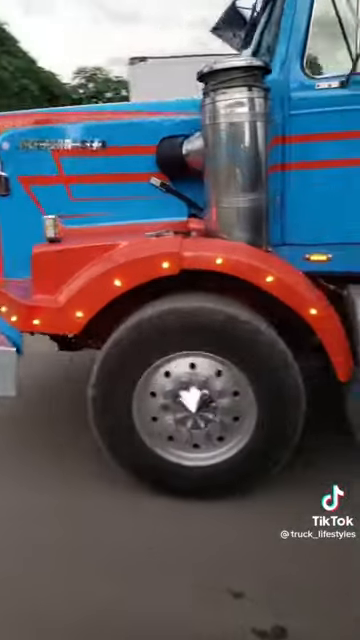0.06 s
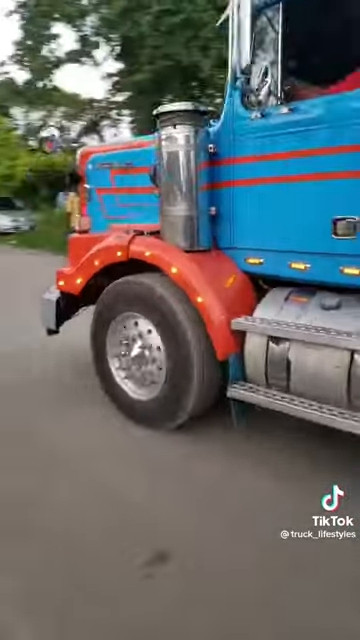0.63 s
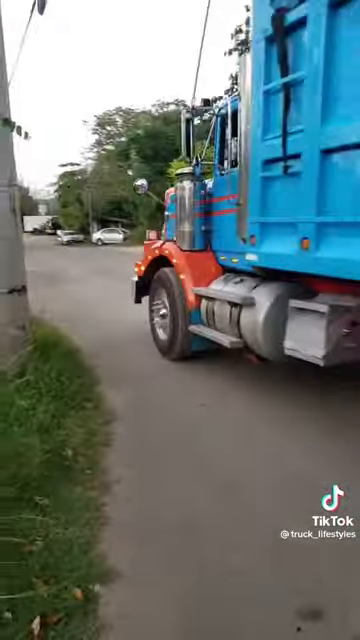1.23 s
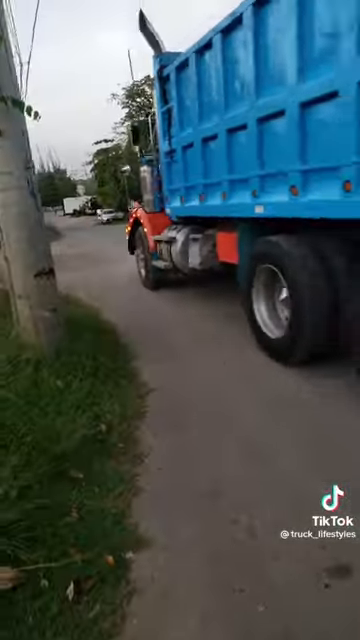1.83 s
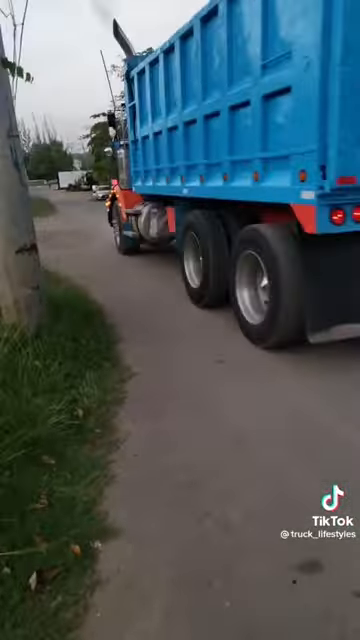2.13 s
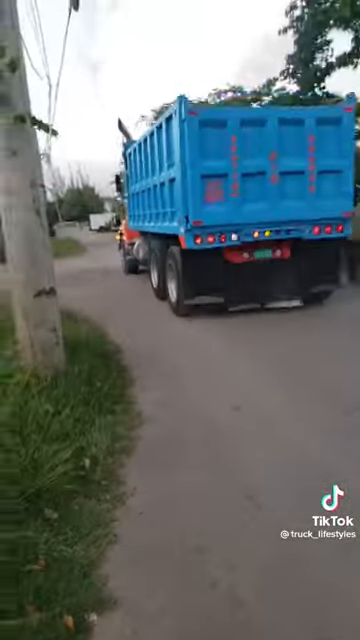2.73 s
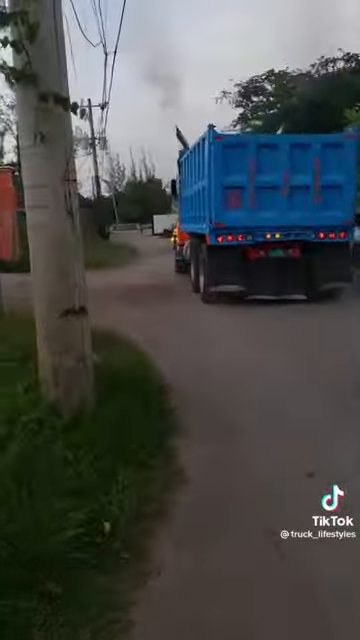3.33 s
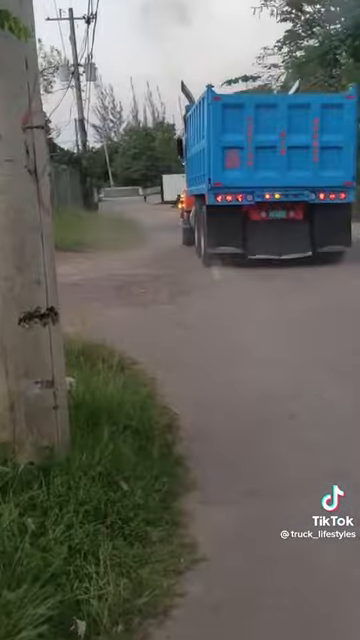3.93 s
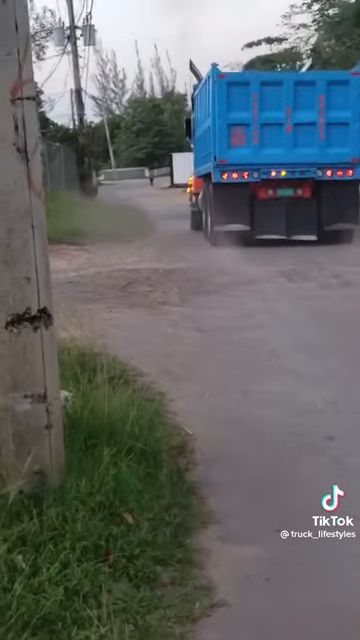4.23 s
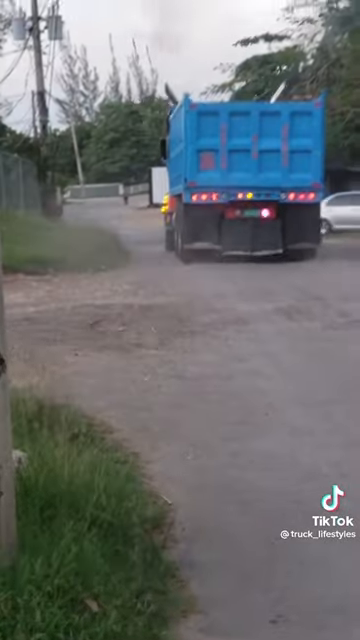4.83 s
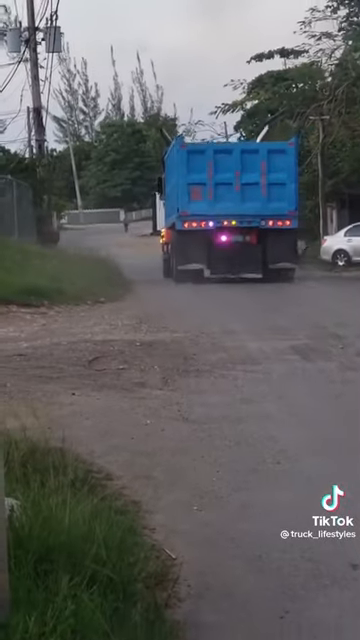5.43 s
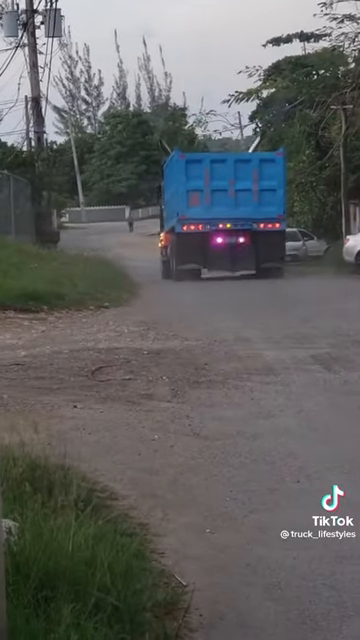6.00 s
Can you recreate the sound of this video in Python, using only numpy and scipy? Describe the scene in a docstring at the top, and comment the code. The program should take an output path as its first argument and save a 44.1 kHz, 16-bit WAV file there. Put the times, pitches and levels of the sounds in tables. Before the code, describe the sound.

A diesel dump truck drones past and up the road, each rev broken by a loud, rattling engine brake burst that echoes briefly.

```python
"""An exhaust drones, an engine rushes and a turbo whistles: a heavy diesel dump truck passes close by
and pulls away up a road through seven quick gear changes. Periodic firing drives the pipe resonances.
At each change the revs fall and the engine brake barks: the cylinders dump compressed air, and a volley
of shocks cracks from the stacks and echoes off trees and road. Late on a panel whines and a loose
fitting clinks. Two unlike microphone ports hear it over a low background rumble."""
import sys
import numpy as np
from scipy import signal
from scipy.fft import rfft, irfft
from scipy.io import wavfile
from scipy.ndimage import uniform_filter1d

SR = 44100
rng = np.random.default_rng(int(sys.argv[2]) if len(sys.argv) > 2 else 0)


def store_pcm(level_fs):
    """Save levels as 16-bit WAV."""
    pcm = np.round(np.clip(level_fs, -1, 1) * 32767).astype(np.int16)
    wavfile.write(sys.argv[1], SR, np.atleast_2d(pcm).T)


N = 267246
TIME = np.arange(N) / SR
HZ = np.fft.rfftfreq(N, 1 / SR)
BRAKE_SAG_HZ_PER_S = 140
RUSH_TAIL_S = 0.057  # gas still flows after the last crack

# Presses of the throttle; levels are relative: (start [s], firing rate then [Hz], top reached [s],
# top rate [Hz], foot lifts [s], firing note [dB], octave [dB], roar [dB], rasp [dB], machinery [dB],
# whistle [dB], turbo surge [Hz])
PULLS = [(0.0, 101.1, 0.1327, 107.9, 0.25, -19.5, -50, -19.5, -29.5, -33.5, -39.5, 740),
         (0.718, 93.93, 1.06, 110.1, 1.12, -18, -22.5, -23, -31.5, -38, -48, 524),
         (1.519, 89.7, 1.84, 111.2, 1.97, -25.5, -19.5, -25, -32, -40, -46, 1035),
         (2.32, 85.64, 2.5, 104.3, 2.44, -54, -45, -48, -52, -63, -62, 110),
         (2.79, 99.48, 3.0, 112.4, 3.07, -30.5, -26, -25.5, -30.5, -37.5, -48, 880),
         (3.43, 92.8, 3.73, 108.3, 4.11, -18.5, -32, -30.5, -34, -42, -44.5, 1100),
         (4.48, 92.04, 4.68, 109.6, 4.75, -17, -38, -51, -56, -49, -66, 56),
         (4.959, 101.1, 5.24, 112.9, 5.26, -18, -23, -32, -32.5, -40, -46, 1252),
         (5.58, 89.2, 5.64, 96.36, 5.93, -37, -45, -62, -37, -41.5, -62, 2),
         (5.83, 88.9, 5.97, 95.9, 6, -25.5, -31, -29.5, -39.5, -59, -54, 1.85)]
# Barks of the engine brake; levels are relative: (first crack [s], last crack [s], cracks [count],
# first cylinder [index, rounded], time to bite [s], fade [dB/s], crack [dB], gas rush [dB], boom [dB],
# 2nd harmonic [dB], 3rd harmonic [dB], blare [dB], low resonance [Hz], lift [dB], high resonance [Hz],
# lift [dB])
BRAKES = [(0.4178, 0.5488, 13, 0.5, 0.0031, -14, -4, -29, -20, -20, -22.5, -28, 466, 7.5, 2020, 1.5),
          (1.2294, 1.3665, 13, -1.5, 0.0057, -9, -5.5, -28.5, -21, -18, -26, -25.5, 373, 8, 1300, -1),
          (2.1336, 2.2668, 13, -1, 0.026, 8, -2.5, -28.5, -24.5, -42, -25.5, -27, 310, 6, 1300, 2),
          (3.2008, 3.3635, 16, -1, 0.034, 1, -4.5, -29.5, -50, -54, -35.5, -28, 1270, 0.5, 2020, -2),
          (4.2825, 4.483, 20, 1.5, 0.017, 15, -6.5, -26.5, -30.5, -22, -38, -27, 393.6, 5.5, 589, 5.5),
          (5.4314, 5.537, 11, 1, 0.008, 21, -8, -49, -36.5, -19.5, -48, -34, 810, 1.5, 2450, 4),
          (5.7052, 5.7772, 7, 2.5, 0.0037, 9, -8, -30, -28, -23, -27.5, -29, 840, 1.5, 2340, 5.5)]
# Spectrum of the brake's gas release from behind the truck: (frequency [Hz], level [dB])
CRACK_BEHIND = [(25,-34),(70,4.5),(180,4),(420,-7),(750,-2.5),(1000,-4),(1400,-3.5),(1900,-7),(2400,-9),(3550,-12),(4150,-10),(5200,-13),(7200,-24.5),(12000,-19.5),(15500,-42)]


def amp(db):
    """Amplitude ratio: tenfold for every 20 dB."""
    return 10 ** (np.asarray(db) / 20)


def unit(x):
    """Normalisation to rms 1."""
    return x / np.sqrt(np.mean(x ** 2) + 1e-20)


def at_hz(points, hz):
    """Interpolation of a spectrum on a log-frequency axis."""
    f, value = np.transpose(points)
    return np.interp(np.log(hz + 1), np.log(f), value)


def curves(rows):
    """Linear interpolation of each column of a time table."""
    s, *columns = np.transpose(rows)
    return [np.interp(TIME, s, c) for c in columns]


def bumps(rows):
    """Superposition of Gaussian bumps: (time [s], half width [s], height)."""
    return sum(height * np.exp(-((TIME - s) / width_s) ** 2) for s, width_s, height in rows)


def colour(x, points):
    """Minimum-phase filtering: the phase follows from the given magnitude spectrum."""
    gain_db = np.maximum(at_hz(points, abs(np.fft.fftfreq(N, 1 / SR))), -100)
    response = np.exp(np.conj(signal.hilbert(np.log(amp(gain_db)))))[:len(HZ)]
    return irfft(rfft(x) * response, N)


def wander(hz):
    """Random modulation: noise of rms 1, low-passed near hz."""
    return unit(irfft(rfft(rng.standard_normal(N)) * np.exp(-(HZ / hz) ** 2), N))


def narrowband(phase, width_hz):
    """Random quadrature modulation broadens a tone into a band."""
    return wander(width_hz) * np.cos(phase) + wander(width_hz) * np.sin(phase)


def turbulence():
    """Diffuse-field coherence: white noise at both ports, alike only in the bass."""
    # Likeness of the ports: (frequency [Hz], coherence [0-1])
    likeness = [(100,0.97),(280,0.95),(450,0),(700,0.11),(2000,0),(8000,0)]
    a, b = rfft(rng.standard_normal((2, N)))
    same = np.clip(at_hz(likeness, HZ), 0, 1)
    return irfft(np.array([a, same * a + np.sqrt(1 - same ** 2) * b]), N)


def ports(x, lag_s=0.001008, shade_hz=520):
    """Acoustic shadow: bass reaches both ports at once, treble gets to the shaded right one late."""
    direct = 1 / (1 + (HZ / shade_hz) ** 4)
    delayed = (1 - direct) * np.exp(-2j * np.pi * HZ * lag_s)
    return np.array([x, irfft(rfft(x) * (direct + delayed), N)])


def heading(x, beside, behind):
    """Directivity: the truck sounds deep from beside and harder once it shows its back."""
    turned = np.clip((TIME - 2.3) / 1.94, 0, 1)
    return (1 - turned) * colour(x, beside) + turned * colour(x, behind)


def climb_left(start, top_s, ease=1.7):
    """Power-law approach to top revs: 1 at the start of a pull, 0 from the top on."""
    return np.clip((top_s - TIME) / (top_s - start), 0, None) ** ease


def engine_speed(hunt=0.00787, fall_ease=1.25, shift_s=0.05):
    """The firing rate [Hz] is the fundamental: it climbs in each pull, falls, and rests for the shift."""
    firing_hz = np.zeros(N)
    for (start, low_hz, top_s, top_hz, lift, *_), after in zip(PULLS, PULLS[1:] + [None]):
        hz = top_hz - (top_hz - low_hz) * climb_left(start, top_s)
        if after:
            next_start, next_hz = after[:2]
            fallen = np.clip((TIME - lift) / (next_start - shift_s - lift), 0, 1) ** fall_ease
            hz -= (top_hz - next_hz) * fallen
        firing_hz = np.where(TIME >= start, hz, firing_hz)
    return firing_hz * (1 + hunt * wander(6.56))


def under_load(tops_db, coasting_db, swell_db, release_db_per_s):
    """Powers add: a layer's level [dB] is its coasting floor plus a swell and decay for each pull."""
    power = amp(coasting_db) ** 2
    for (start, _, top_s, _, lift, *_), top_db in zip(PULLS, tops_db):
        released_db = release_db_per_s * np.maximum(TIME - lift, 0)
        level_db = top_db - swell_db * climb_left(start, top_s) - released_db
        power = power + amp(np.maximum(level_db, -120)) ** 2
    return 10 * np.log10(power)


def drone(turns, note_db, octave_db):
    """Periodic outflow sounds the firing note and its octave, throbbing once per six-firing cycle."""
    # Brief swells and dips of the note: (time [s], half width [s], gain [dB])
    swells = [(0.63, 0.043, 9), (3.88, 0.13, 6), (4.1, 0.042, -7.5), (4.241, 0.051, 10),
              (4.87, 0.061, 12.5), (5.06, 0.069, 5), (5.4, 0.072, 9.5), (5.82, 0.061, 9.5),
              (1.83, 0.09, 2.5), (6.0, 0.077, 5)]
    waver_db = .9 * wander(22) + .4 * np.sin(2 * np.pi * turns / 6)
    note = amp(note_db + bumps(swells) + waver_db) * np.sin(2 * np.pi * turns)
    octave = amp(octave_db - 1 + waver_db) * np.sin(4 * np.pi * turns)
    return np.sqrt(2) * (note + octave)


def orders(turns, crank_db, cycle_db):
    """Engine orders: unequal cylinders add crank and cycle harmonics between those of the firing."""
    cycle = 2 * np.pi * turns / 6 + .007 * wander(18)
    swell = amp(3 * wander(6))
    out = np.zeros(N)
    for k in range(7, 90):
        if k != 12:  # the firing octave belongs to the drone and the hoot
            weight = amp(cycle_db if k % 2 else crank_db if k % 3 else 0)
            own_swell = np.roll(swell, rng.integers(N))
            out += weight * own_swell * np.cos(k * cycle + rng.uniform(0, 2 * np.pi))
    return out


def firings(turns, uneven, length):
    """Amplitude modulation by six unequal cylinders; length is the decay time in firing periods."""
    count = turns.astype(int)
    cylinder_db = np.array([-0.54, -0.051, 0.84, 0.24, -0.14, -0.094])
    size_db = cylinder_db[count % 6] + rng.standard_normal(N)[count]
    return unit(amp(uneven * size_db) * np.exp(-(turns % 1) / length))


def exhaust(turns, roar_db, rasp_db):
    """Pipe resonance: engine orders and rough gas puffs excite a low roar and a higher rasp."""
    # Pipe responses: (frequency [Hz], gain [dB])
    roar_beside = [(70,-59),(135,-5.5),(180,-4),(300,2.5),(450,-1),(560,-3.5),(900,-33.5)]
    roar_behind = [(70,-54),(135,2.5),(180,4.5),(300,0),(400,-1.5),(480,-1),(560,-4),(900,-33.5)]
    rasp_band = [(400,-25),(580,4.5),(730,4),(900,-5.5),(1100,-10),(1450,-13),(2200,-34)]
    growl = ports(orders(turns, crank_db=-2, cycle_db=-12))
    gas = turbulence() * firings(turns, uneven=2.0, length=0.44)
    roar = unit(heading(growl, roar_beside, roar_behind))
    roar += amp(-10) * unit(heading(gas, roar_beside, roar_behind))
    rasp = amp(-4) * unit(colour(growl, rasp_band)) + amp(-5) * unit(colour(gas, rasp_band))
    return amp(roar_db - 0.5) * roar + amp(rasp_db + 2.5) * rasp


def machinery(turns, level_db):
    """Weakly modulated noise: an almost steady, slightly rough mechanical rush from the engine."""
    # Spectra of the rush: (frequency [Hz], level [dB])
    rush_beside = [(760, -27), (1300, 0), (1740, -2), (1810, -1), (2810, -7), (3320, -4.5), (4110, -6.5),
                   (4590, -5.5), (7020, -16), (7500, -20), (9750, -54), (16500, -120)]
    rush_behind = [(800,-8),(1200,6.5),(1600,3.5),(2050,-5.5),(2450,2.5),(2720,3.5),(2950,-1.5),(4200,-0.5),(4600,-4),(5000,-2),(5700,-9),(7500,-17),(10000,-63)]
    rough_noise = turbulence() * firings(turns, uneven=1.08, length=22.0)
    return amp(level_db + 2) * unit(heading(rough_noise, rush_beside, rush_behind))


def fan(turns, top_db=-30, db_per_hz=0.22):
    """Blade-passing tone: the engine-driven fan hums, louder at high revs."""
    # The fan gains on the engine as its clutch takes hold: (time [s], blade passes [per firing])
    fan_ratio = [(0.2, 2.83), (0.8, 3.18), (1.9, 3.25), (5.2, 3.2)]
    firing_hz = np.gradient(turns) * SR
    passes = np.cumsum(firing_hz * curves(fan_ratio)[0]) / SR
    hum = np.sin(2 * np.pi * passes + .4 * wander(12)) * amp(2 * wander(5))
    return ports(amp(top_db + db_per_hz * (firing_hz - firing_hz.max())) * hum)


def turbo_speed(surges_hz, up_s=0.36, down_s=0.26, lag_s=0.034):
    """Turbo lag: the blade pitch [Hz] rises late in each pull and peaks just after the foot lifts."""
    # Pitch between surges: (time [s], frequency [Hz])
    base_pitch = [(0, 7330), (0.52, 7760), (0.72, 8340), (0.88, 7860), (1.33, 7570), (1.55, 8400),
                  (1.7, 8030), (2.4, 8800), (2.8, 8280), (3.5, 9160), (4.95, 9370), (6.06, 8500)]
    hz = curves(base_pitch)[0]
    for (_, _, _, _, lift, *_), surge_hz in zip(PULLS, surges_hz):
        hz += np.interp(TIME - lift - lag_s, [-up_s, 0, down_s], [0, surge_hz, 0])
    return uniform_filter1d(hz, size=3000)


def turbo(blade_hz, whistle_db, hiss_db):
    """Spectral broadening: a fuzzy blade whistle with a wide skirt, over the hiss of intake air."""
    # Intake noise: (frequency [Hz], level [dB])
    intake = [(5000,-9.5),(7000,-12),(9500,-5),(11000,2.5),(12000,8),(13200,0.5),(15000,-11),(16000,-33)]
    phase = 2 * np.pi * np.cumsum(blade_hz) / SR
    core = np.array([narrowband(phase, 130) for _ in range(2)])
    skirt = np.array([narrowband(phase, 500) for _ in range(2)])
    flutter_db = 3.1 * wander(9.3) + 1.8 * wander(4)
    whistle = amp(whistle_db + flutter_db) * (amp(-2) * core + amp(-6) * skirt)
    return whistle + amp(hiss_db) * unit(colour(turbulence(), intake))


def rumble():
    """Ambient noise: a low background rumble comes up slightly, then holds steady."""
    # Background spectrum: (frequency [Hz], level [dB])
    background = [(25,-39),(42,-12),(53,-13.5),(66,-6.5),(85,-15.5),(130,-14),(220,-39),(500,-47)]
    level_db = np.interp(TIME, [1, 2], [-41, -38])
    return amp(level_db) * unit(colour(turbulence(), background))


def lulls(fuel_cut_db=-6):
    """Weaker excitation: the engine's gain dips between gears and while the brake cuts the fuel."""
    # Dips between gears: (time [s], half width [s], gain [dB])
    gear_dips = [(0.71,0.041,-2.5),(1.56,0.026,-6),(2.72,0.057,-3.5),(3.15,0.056,-1.5),(3.5,0.08,-6),(4.95,.03,-1),(5.65,0.05,-2)]
    fuel_cuts = [((start + end) / 2, (end - start) / 2, fuel_cut_db) for start, end, *_ in BRAKES]
    return amp(bumps(gear_dips) + bumps(fuel_cuts))


def opening_rate(start, end, count):
    """Uniform deceleration: a bark opens at its mean firing rate [Hz] plus half the sag."""
    return (count - 1) / (end - start) + BRAKE_SAG_HZ_PER_S * (end - start) / 2


def volleys(bite_db_per_s=205):
    """Slowing pulse trains, (time [s], level [dB]): cracks grow as the brake bites, then fade or swell."""
    # Crack strength in firing order, every third weak: (level [dB])
    cylinders_db = [0, -9, -2, -0.5, -9, -2]
    shots = []
    for start, end, count, first, bite_s, fade, peak_db, *_ in BRAKES:
        first_hz = opening_rate(start, end, count)
        for k in range(count):
            hz = np.sqrt(first_hz ** 2 - 2 * BRAKE_SAG_HZ_PER_S * k)
            age = (first_hz - hz) / BRAKE_SAG_HZ_PER_S
            drop_db = bite_db_per_s * max(bite_s - age, 0) + fade * max(age - bite_s, 0)
            shots.append((start + age, peak_db + cylinders_db[(round(first) + k) % 6] - drop_db))
    return shots


def ring(modes):
    """Free vibration: struck metal sounds a sum of damped modes."""
    return sum(amp(db - 60 * TIME / t60) * np.sin(2 * np.pi * hz * TIME) for hz, db, t60 in modes)


def cracks(spray_db=-15, spray_s=0.0036, bounce_s=0.0044, bounce=0.11, front_s=18e-6, steepen=2.4):
    """Shock waves: each dump of compressed air cracks, reflects off the body, sprays and rings the pipe."""
    # The hardest cracks: (time [s], shock level [dB], spray relative to it [dB])
    reports = [(0.417,-0.5,0.5),(0.4373,1,0.5),(0.448,-1,0),(0.479,3.5,-2),(0.5015,0.5,2),(0.513,1.5,0),(0.5367,2.5,-1),(0.5487,3.5,-1),
               (1.2290,-4,0),(1.261,-3,3),(1.283,-0.5,2.5),(1.2945,-2.5,5),(1.3176,-0.5,2.5),(1.3289,-2,1),(1.3535,1,0.5),
               (2.134,-4.5,2),(2.1658,-3,-2),(2.1861,7,-4),(2.1973,2.5,-0.5),(2.2198,2,1),(2.2547,0,2.5),
               (3.2306,-2,-3),(3.2506,-1.5,-2),(3.2613,0.5,-4),(3.2827,2,-3.5),(3.2934,1,-3),(3.3156,1,-2.5),(3.3499,-1,2.5),
               (4.3213,-0.5,-4),(4.3400,-1.5,-6),(4.4045,-5,1),(4.4384,-7,-3),(4.4816,-2.5,-1),
               (5.431,-6.5,-0.5),(5.4415,-7,-2),(5.4721,-3,-2.5),(5.4925,-2.5,-3),(5.5250,-5,-1),
               (5.7047,-4.5,-4),(5.7282,-3,-3),(5.7401,-8.5,-3),(5.7640,-3.5,0),(5.7770,-2.5,1)]
    # Crack spectrum from beside the truck: (frequency [Hz], level [dB])
    crack_beside = [(60,-54),(190,-2.5),(390,-2.5),(560,-15.5),(750,-9),(1150,-13.5),(1420,-20),(1750,-16.5),(2250,-16),(3000,-21),(4900,-20),(8000,-37),(12000,-27.5),(15500,-35)]
    # Modes of the stack pipes: (frequency [Hz], level [dB], t60 [s])
    stack_modes = [(738,-16,0.021),(884,-18.5,0.013),(2240,-36,0.045),(4067,-23,0.024),(4950,-30.5,0.024)]
    # How squarely the stack mouths face the listener: (time [s], ring gain [dB])
    facing = [(2,-32),(3.3,-39),(4.4,-2),(5.5,8.5)]
    shocks, bounces, gas = np.zeros((3, N))
    age = TIME[:64]
    ordinary = [(s, db, 0) for s, db in volleys() if min(abs(s - row[0]) for row in reports) > .005]
    shots = reports + ordinary
    for (s, db, gas_db), path in zip(shots, rng.uniform(0.36, 1.2, len(shots))):
        front = np.exp(-age * amp(steepen * db) / front_s)  # strong shocks steepen, weak ones stay dull
        front *= amp(db + 1) / front.sum()
        at = round((s + .0008) * SR)
        shocks[at:][:len(age)] += front
        gas[at:][:len(age)] += amp(gas_db) * front
        bounces[at + round(path * bounce_s * SR):][:len(age)] -= bounce * front
    spray = signal.lfilter([1], [1, -np.exp(-1 / (spray_s * SR))], gas) * turbulence()
    air = heading(ports(shocks + bounces) + amp(spray_db) * spray, crack_beside, CRACK_BEHIND)
    impulse_peak = abs(colour(1. * (TIME == 0), CRACK_BEHIND)).max()
    metal = ports(signal.fftconvolve(shocks, ring(stack_modes))[:N]) * amp(curves(facing)[0])
    return air / impulse_peak + metal


def brake_flow(open_s=0.0064, close_s=0.04, linger_db=2, fade_db_per_s=83):
    """Valve gating: gains of rush, boom, two hoots and blare while the brake is open; the boom lingers."""
    gains = np.zeros((5, N))
    for start, end, _, _, bite_s, _, _, rush_db, boom_db, octave_db, third_db, blare_db, *_ in BRAKES:
        rise = (TIME - start) / (bite_s + open_s)
        fall = (end + RUSH_TAIL_S - TIME) / close_s
        opening = np.clip(np.minimum(rise, fall), 0, 1)
        linger = (TIME > end) * amp(linger_db - fade_db_per_s * abs(TIME - end))
        gains += [amp(rush_db) * opening, amp(boom_db) * np.maximum(opening, linger),
                  amp(octave_db) * opening, amp(third_db) * opening, amp(blare_db) * opening]
    return gains


def braking_speed():
    """Uniform deceleration: the firing rate [Hz] sags through each bark until the gas stops."""
    hz = np.full(N, opening_rate(*BRAKES[0][:3]))
    for start, end, count, *_ in BRAKES:
        sag = BRAKE_SAG_HZ_PER_S * (np.minimum(TIME, end + RUSH_TAIL_S) - start)
        hz = np.where(TIME >= start, opening_rate(start, end, count) - sag, hz)
    return hz


def blowdown():
    """Forced oscillation: gas rushes out, and the stack booms, hoots and blares on falling harmonics."""
    # Stack responses for the boom and the brassy blare: (frequency [Hz], gain [dB])
    boom_beside = [(90,-35),(150,6.5),(200,-4.5),(300,-19),(400,-7),(520,-11),(750,-29),(1100,-30),(2000,-43)]
    boom_behind = [(90,-22),(150,-1),(200,-4),(300,-6),(400,-6.5),(520,-10),(750,-11),(1100,-3.5),(2000,-52)]
    blare_band = [(250,-25),(420,-2.5),(700,2.5),(950,-3.5),(1300,-16.5),(2000,-21.5)]
    rush, boom, octave, third, blare = brake_flow()
    turns = np.cumsum(braking_speed()) / SR
    puffs = turbulence() * firings(turns, uneven=1.2, length=2.0)
    growl = ports(orders(turns, crank_db=-4, cycle_db=-13))
    brass = ports(orders(turns, crank_db=-11, cycle_db=-20))
    hoot = ports(octave * np.sin(2 * np.pi * 2 * turns) + third * np.sin(2 * np.pi * 3 * turns))
    return (rush * unit(colour(puffs, CRACK_BEHIND)) + amp(1) * hoot
            + blare * unit(colour(brass, blare_band))
            + amp(-2) * boom * unit(heading(growl, boom_beside, boom_behind)))


def hollow(brake, low_q=5, high_q=7):
    """Formants: two resonant bands, lifted or cut, give each bark its own hollow colour."""
    out = brake
    ends = [row[0] for row in BRAKES[1:]] + [np.inf]
    for (start, *_, low_hz, low_db, high_hz, high_db), end in zip(BRAKES, ends):
        bark = brake * ((TIME >= start) & (TIME < end))
        for hz, db, q in (low_hz, low_db, low_q), (high_hz, high_db, high_q):
            out = out + (amp(db) - 1) * signal.lfilter(*signal.iirpeak(hz, q, fs=SR), bark)
    return out


def street_echo(x, delay_s=0.0022):
    """Reverberation: trees and road return a diffuse tail, each band dying at its own rate."""
    # Decay of the echo: (frequency [Hz], t60 [s])
    decay = [(150,0.79),(700,0.68),(4000,0.62),(12000,0.6)]
    hz, t, bands = signal.stft(turbulence()[:, :SR], SR, nperseg=256)
    tail = signal.istft(bands * amp(-60 * t / at_hz(decay, hz)[:, None]), SR, nperseg=256)[1]
    tail *= np.clip(np.arange(tail.shape[1]) / SR / delay_s - 1, 0, 1)
    echo = signal.fftconvolve(x, tail / np.linalg.norm(tail[0]), axes=1)[:, :N]
    return colour(echo, [(170, -8), (330, -2.5), (700, -6.5), (3000, -5.5)])


def zings(width_hz=110):
    """Shock excitation: the stack or loose sheet metal buzzes on after a crack."""
    # Excited modes: (time [s], frequency [Hz], level [dB], t60 [s])
    modes = [(0.48,4950,-42,0.17),(0.502,3950,-37,.22),(1.284,3480,-29,0.5),(1.354,386.6,-22,.6),(2.187,2650,-41,.25),(3.283,4400,-28,.25),(3.351,2020,-24,0.12),(4.34,1300,-21,0.41)]
    out = np.zeros(N)
    buzz = wander(width_hz) + 1j * wander(width_hz)
    for s, hz, db, t60 in modes:
        age = np.maximum(TIME - s, 0)
        out += (TIME > s) * amp(db - 60 * age / t60) * (buzz * np.exp(2j * np.pi * hz * age)).real
    return ports(out)


def afterbarks(thump_hz=60, thump_s=0.011):
    """Glide and damped pulse: a low hoot rises as the engine picks up, or a dull thump ends a bark."""
    # Rising hoots: (start [s], end [s], first pitch [Hz], last pitch [Hz], level [dB])
    hoots = [(0.54, 0.82, 144, 177, -22), (5.466, 5.638, 175, 186, -21.5)]
    # Thumps as the brake shuts: (time [s], level [dB])
    thumps = [(2.263, -27), (5.775, -20)]
    out = np.zeros(N)
    for start, end, first_hz, last_hz, db in hoots:
        along = np.clip((TIME - start) / (end - start), 0, 1)
        phase = 2 * np.pi * np.cumsum(first_hz + (last_hz - first_hz) * along) / SR
        out += amp(db) * np.sin(np.pi * along) * np.sin(phase)
    for s, db in thumps:
        age = np.maximum(TIME - s, 0)
        envelope = age / thump_s * np.exp(1 - age / thump_s)
        out += amp(db) * envelope * np.sin(2 * np.pi * thump_hz * age)
    return ports(out)


def panel_whine(machinery_db):
    """Panel resonance: a thin, drifting tone follows the machinery's level once the truck is past."""
    # Pitch of the panel: (time [s], frequency [Hz])
    pitch = [(2.9,2650),(3.8,2775),(4.6,2535),(5.2,2460),(6.06,2374)]
    phase = 2 * np.pi * np.cumsum(curves(pitch)[0]) / SR
    gone_past = np.interp(TIME, [2.5, 2.9], [0, 1])
    return ports(amp(machinery_db - 8) * gone_past * narrowband(phase, width_hz=55))


def clinks():
    """Impact excitation: a loose fitting is jolted and rings in its natural modes."""
    # Jolts: (time [s], level [dB])
    jolts = [(5.977,-31.5)]
    # Modes of the fitting: (frequency [Hz], level [dB], t60 [s])
    modes = [(3310,7.5,0.028),(5180,-2.5,.2)]
    return ports(sum(amp(db) * np.interp(TIME - s, TIME, ring(modes), left=0) for s, db in jolts))


def scene():
    """Superposition: the throttle sets the engine's levels, and the brake alone echoes in the street."""
    # Off-throttle levels as the truck passes and recedes:
    # (time [s], roar [dB], rasp [dB], machinery [dB], whistle [dB], hiss [dB])
    coasting = [(0.0, -23, -29.5, -34, -37, -37), (0.55, -27, -34, -36.5, -48, -37.5),
                (1.4, -31, -37, -38, -51, -42), (1.75, -35, -41.5, -42, -69, -48.5),
                (2.7, -35, -37.5, -43, -63, -52), (3.4, -30.5, -44, -42.5, -56, -51),
                (5.0, -29.5, -34, -43, -45, -50.5), (6.06, -35.5, -48, -45, -63, -53)]
    *_, notes, octaves, roars, rasps, machinery_tops, whistles, surges_hz = np.transpose(PULLS)
    coast_roar, coast_rasp, coast_machinery, coast_whistle, coast_hiss = curves(coasting)
    note_db = under_load(notes, coasting_db=-35, swell_db=10, release_db_per_s=109)
    octave_db = under_load(octaves, coasting_db=-41, swell_db=9, release_db_per_s=211)
    roar_db = under_load(roars, coast_roar, swell_db=9.5, release_db_per_s=134)
    rasp_db = under_load(rasps, coast_rasp, swell_db=7, release_db_per_s=117)
    machinery_db = under_load(machinery_tops, coast_machinery, swell_db=8.5, release_db_per_s=47)
    whistle_db = under_load(whistles, coast_whistle, swell_db=62, release_db_per_s=26)
    hiss_db = coast_hiss + 0.39 * (machinery_db - coast_machinery)  # the intake draws harder under load
    turns = np.cumsum(engine_speed()) / SR  # phase, one turn per firing
    engine = drone(turns, note_db, octave_db) + exhaust(turns, roar_db, rasp_db)
    engine += machinery(turns, machinery_db)
    brake = hollow(cracks() + blowdown())
    street = street_echo(brake)
    truck = lulls() * (engine + fan(turns)) + panel_whine(machinery_db)
    truck += turbo(turbo_speed(surges_hz), whistle_db, hiss_db)
    return truck + brake + afterbarks() + zings() + street + rumble() + clinks()


def record(dry, edge_hz=15650):
    """Transduction: each port has its own frequency response, then clips and is band-limited."""
    # Left port minus right: (frequency [Hz], level [dB])
    balance = [(120,0.55),(240,1.6),(450,-9.5),(720,6.5),(1100,3),(1500,2.5),(2300,6),(3400,9.5),(4600,11),(6300,3.5),(8500,0),(12000,-4.5),(15000,-1.5)]
    tilt_db = at_hz(balance, HZ) / 2
    heard = np.clip(irfft(rfft(dry) * amp([tilt_db, -tilt_db]), N), -1, 1)
    lowpass = signal.firwin(511, edge_hz, window=("kaiser", 9), fs=SR)
    return signal.oaconvolve(heard, lowpass[None], "same")


dry = scene()
out = record(dry)
store_pcm(out)
```